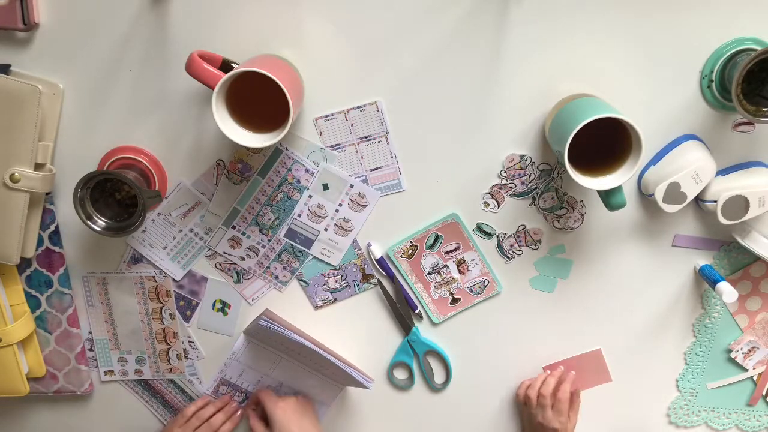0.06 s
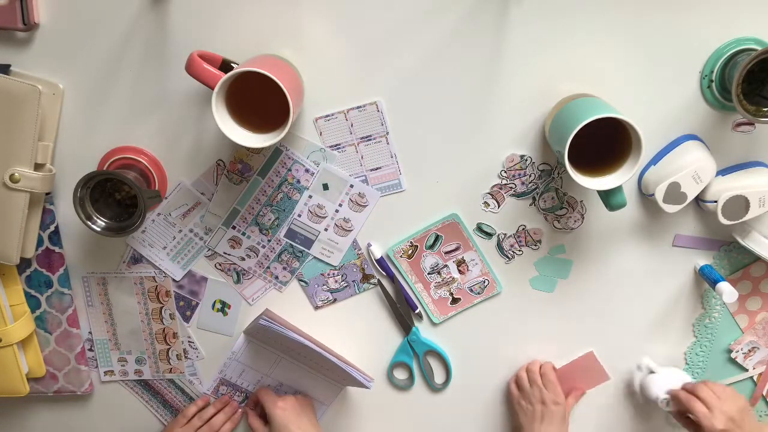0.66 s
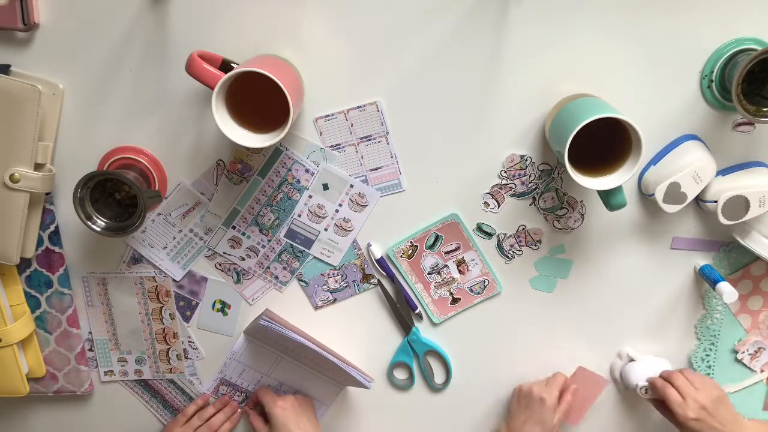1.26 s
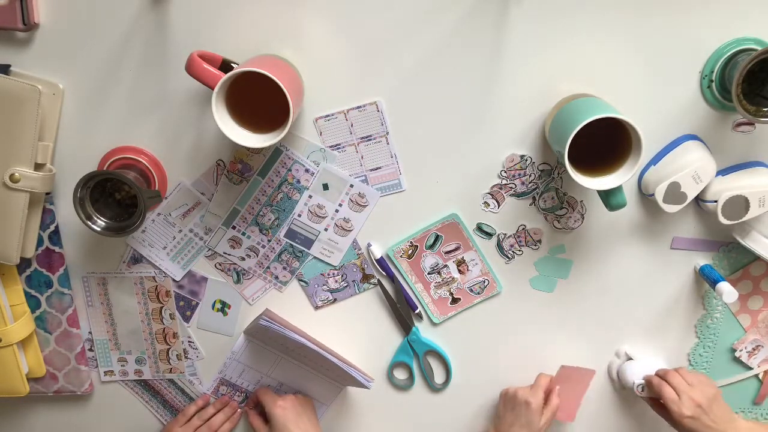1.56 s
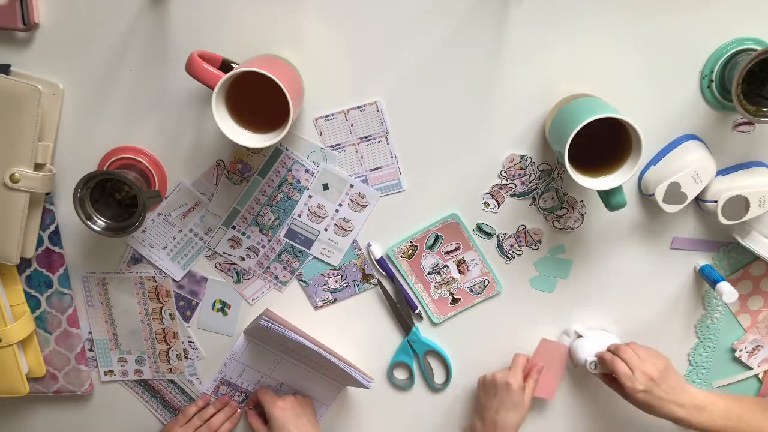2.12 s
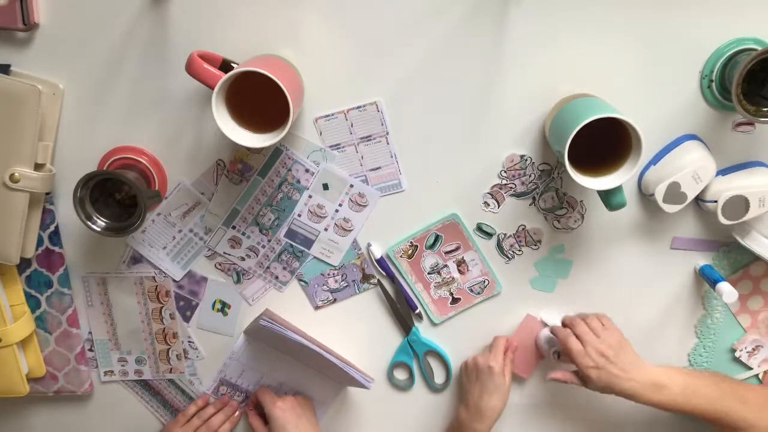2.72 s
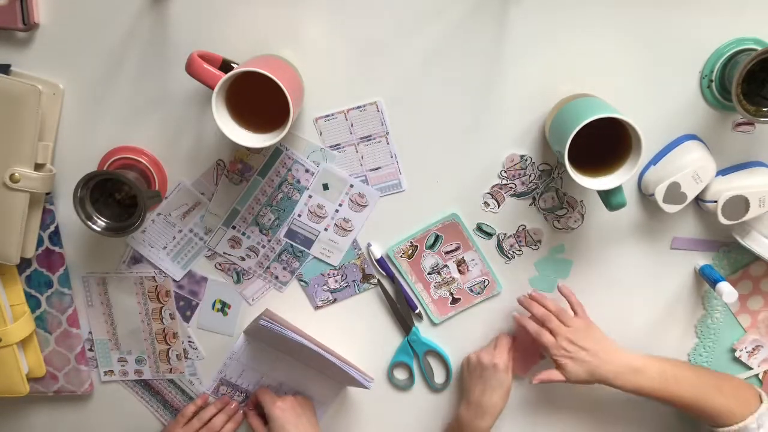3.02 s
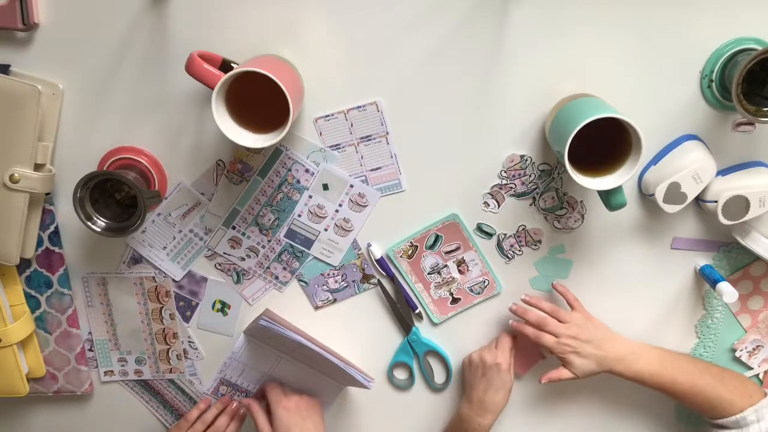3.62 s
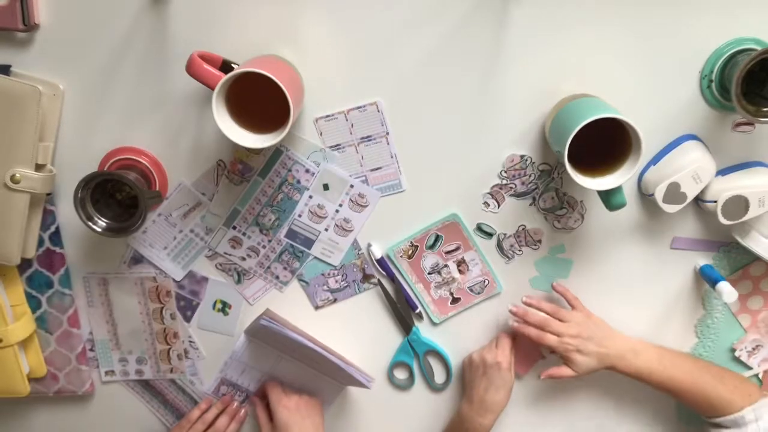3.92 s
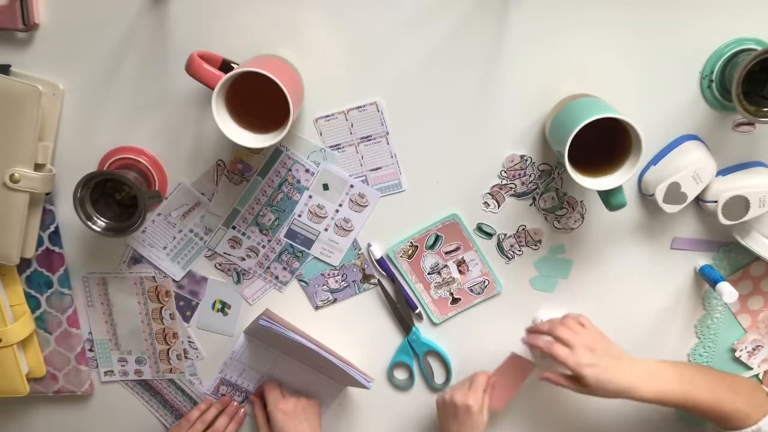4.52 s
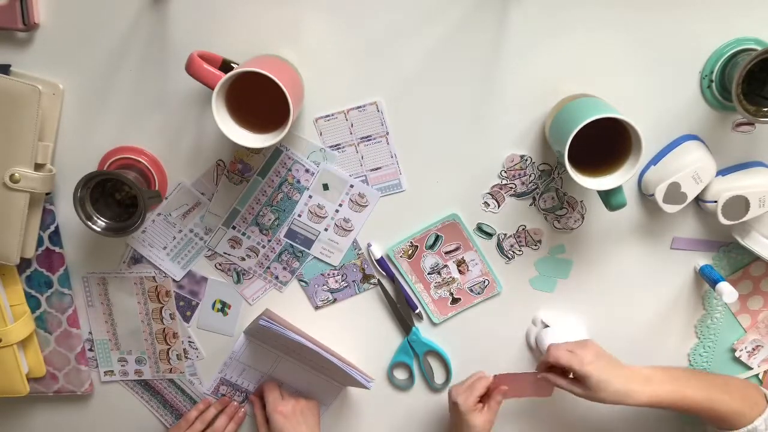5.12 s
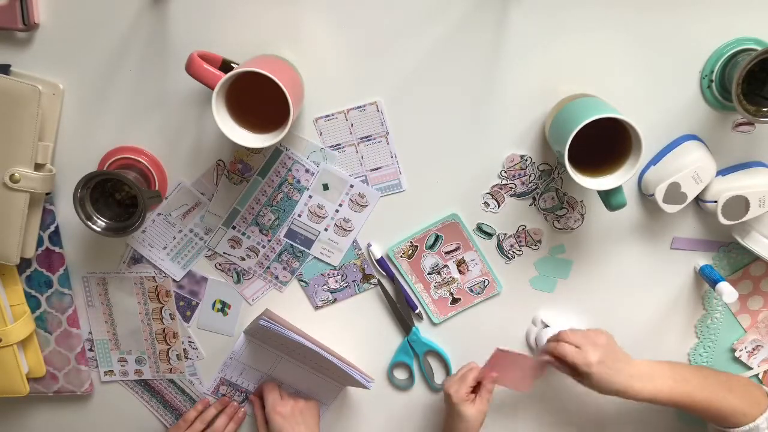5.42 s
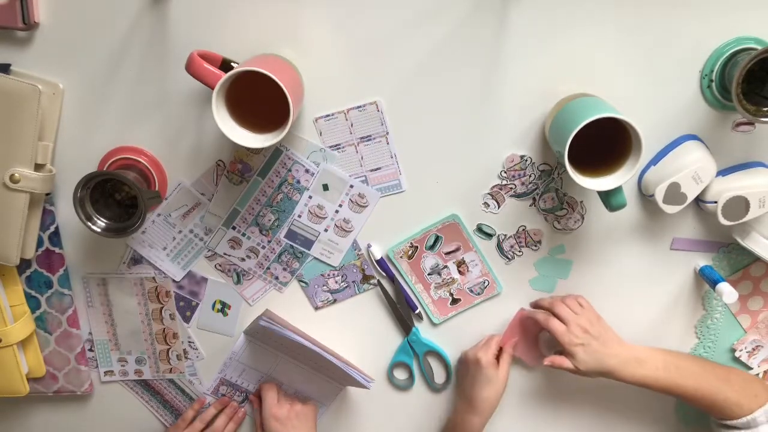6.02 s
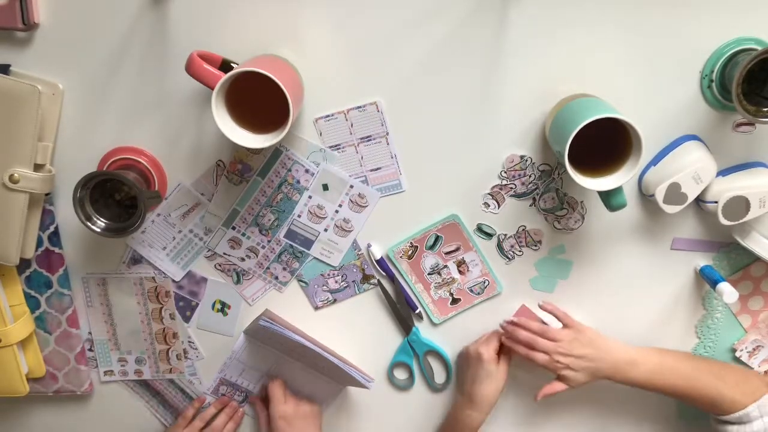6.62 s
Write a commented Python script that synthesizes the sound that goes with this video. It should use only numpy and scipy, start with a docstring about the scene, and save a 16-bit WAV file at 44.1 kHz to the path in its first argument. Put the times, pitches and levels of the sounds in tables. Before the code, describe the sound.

Light card scrapes and table thumps as a plastic paper punch is lined up, pressed with a snap, released and repositioned.

```python
"""Cardstock scrapes softly on a table, then a plastic craft punch knocks, clacks and snaps through it.
The punch is pulled over, set down, pressed, let go and lined up again; its lever rubs as it lifts.
Card fibres catch and slip, the card ticks, hands drag, and each knock rings the table top.
A small bare room answers, heard from an overhead microphone."""
import sys
import numpy as np
from scipy import signal
from scipy.fft import rfft, irfft
from scipy.io import wavfile
from scipy.ndimage import uniform_filter1d

SR = 44100
rng = np.random.default_rng(int(sys.argv[2]) if len(sys.argv) > 2 else 0)


def unload_audio(sound):
    """Save the sound as a 16-bit wav file, at the path given as the first command line argument."""
    columns = np.transpose(np.atleast_2d(sound))
    # keep every value between -1 and 1, then stretch to whole-number steps
    steps = np.round(np.clip(columns, -1, 1) * 32767)
    wavfile.write(sys.argv[1], SR, steps.astype(np.int16))


N = 298116
TIME_S = np.arange(N) / SR
RING_S = TIME_S[:SR // 2]
TOP_HZ = 16100


def undb(db):
    """Decibels to gain."""
    return 10 ** (np.asarray(db) / 20)


def unit(x):
    """Scale to rms 1."""
    return x / np.sqrt(np.mean(x ** 2))


def unit_hit(x):
    """Scale to the energy of 10 ms at rms 1."""
    return x * np.sqrt(SR / 100 / np.sum(x ** 2))


def add(track, start_s, sound):
    """Mix a sound into the track."""
    start = int(start_s * SR)
    track[start:start + len(sound)] += sound[:N - start]


def cut(x, hz, kind, order=2):
    """Causal low-pass or high-pass."""
    return signal.sosfilt(signal.butter(order, hz, kind, fs=SR, output="sos"), x)


def resonate(x, hz, q):
    """One resonance, Q at least 1."""
    return signal.lfilter(*signal.iirpeak(hz, max(q, 1), fs=SR), x)


def colour(x, spectrum):
    """Filter by a (Hz, dB) curve, to rms 1."""
    hz, db = np.transpose(spectrum)
    bins_hz = np.maximum(np.arange(N // 2 + 1) * SR / N, 1)
    gain = undb(np.interp(np.log(bins_hz), np.log(hz), db))
    return unit(irfft(rfft(x) * gain, N))


def flatten(x, bins):
    """Level a burst's broad spectral humps, keeping its fine grain."""
    spectrum = rfft(x)
    return irfft(spectrum / np.sqrt(uniform_filter1d(np.abs(spectrum) ** 2, size=bins)), len(x))


def fade(t60_s):
    """Exponential decay."""
    return np.exp(-np.log(1000) * RING_S / t60_s)


def swell(rise_s):
    """Contact builds up over a moment."""
    return 1 - np.exp(-RING_S / rise_s)


def wander(rate_hz):
    """Smooth random drift, rms 1."""
    hold = int(SR / rate_hz)
    steps = np.repeat(rng.standard_normal(N // hold + 1), hold)
    return unit(uniform_filter1d(steps, hold)[:N])


def friction(slips_per_s, spread_db, flutter_db):
    """Surfaces catch and let go: dense slips of uneven size, in uneven runs."""
    slips = (rng.random(N) < slips_per_s / SR) * rng.standard_normal(N)
    sizes = undb(spread_db * np.minimum(rng.exponential(size=N), 5))
    return slips * sizes * undb(flutter_db * wander(45))


def flex(x, depth_db, rate_hz):
    """The sliding card bends, so its resonant zones swell and fade separately."""
    zones = [resonate(x, hz, q=3) for hz in np.geomspace(700, 14000, 9)]
    return unit(x + sum(zone * (undb(depth_db * wander(rate_hz)) - 1) for zone in zones))


# Spectra of card scrape and card hiss. Each row: frequency in Hz, relative density in dB.
SCRAPE_SPECTRUM = [(250, -11), (600, 8), (1000, 7.5), (1600, 10.5), (2700, 4), (4200, -8), (7000, -8),
                   (16000, -34)]
HISS_SPECTRUM = [(1500, -11.5), (3500, -1.5), (5000, -3), (7000, -6), (9000, -6.5), (11000, -9.5),
                 (16000, -8)]
# Card edge under pressure. Each row: start in seconds, length in seconds, level in dB.
FIRM_STROKES = [(0, 0.028, -66), (.47, 0.18, -73.5), (.78, 0.13, -72.5), (1.02, 0.061, -75),
                (1.69, 0.082, -59.5), (2.28, 0.27, -71), (3.01, 0.16, -69), (3.29, 0.13, -63.5),
                (3.56, 0.16, -63), (3.79, 0.045, -58.5), (4.12, 0.085, -58.5), (4.92, 0.087, -62),
                (5.1, 0.054, -72), (5.81, 0.077, -57.5), (6.5, 0.076, -66), (6.62, .17, -64.5)]
# Light, quick slides of card and punch. Each row: start in seconds, length in seconds, level in dB.
LIGHT_STROKES = [(.77, 0.36, -72), (.955, 0.29, -59), (1.345, 0.1, -65.5), (1.55, 0.28, -71.5),
                 (2.24, 0.35, -68), (3.32, 0.11, -71.5), (4.28, 0.22, -61), (4.78, 0.33, -62.5),
                 (5.195, 0.18, -62), (5.41, 0.078, -66), (5.815, 0.16, -57), (6.19, 0.1, -68.5),
                 (6.47, 0.089, -73.5)]


def card_slides(fingers_db=-85):
    """Paper fibres slip: firm strokes mostly scrape, light ones mostly hiss."""
    scrape = colour(friction(11000, spread_db=1.3, flutter_db=2.6), SCRAPE_SPECTRUM)
    scrape = flex(scrape, depth_db=2.2, rate_hz=22)
    hiss = colour(friction(18000, spread_db=1, flutter_db=1), HISS_SPECTRUM)
    hiss = flex(hiss, depth_db=2.9, rate_hz=16)
    fingers = undb(fingers_db + 3 * wander(4.4))  # never quite still on the card
    firm = strokes(FIRM_STROKES) + fingers
    light = strokes(LIGHT_STROKES)
    return scrape * np.hypot(firm, undb(-10.5) * light) + hiss * np.hypot(light, undb(-10) * firm)


def strokes(rows, fastest_share=0.34, speed_power=0.7):
    """Envelope of hand movements: each speeds up smoothly and slows to a stop."""
    envelope = np.zeros(N)
    for start_s, length_s, db in rows:
        along = np.linspace(0, 1, int(length_s * SR))
        speed = np.sin(np.pi / 2 * np.interp(along, [0, fastest_share, 1], [0, 1, 0]))
        add(envelope, start_s, undb(db) * speed ** speed_power)
    return envelope


# Lasting modes of the table top. Each row: frequency in Hz, relative level in dB, t60 in seconds.
TABLE_MODES = [(65, -16.5, 0.2), (87.2, -15.5, 0.42), (115, -6, 0.2), (156, -19.5, 0.71), (202.1, -9, 0.24),
               (276.7, 1, 0.14), (296.5, 0.5, 0.12), (347.4, -12, 0.32), (427.3, -1, 0.078),
               (575.4, -14, 0.29), (598, -13.5, 0.2), (675, -3, 0.074), (755, -17, 0.099), (935, -4, 0.042),
               (1158, -3.5, 0.084)]
# Hands leaning on the table. Each row: start in seconds, length in seconds, level in dB.
HAND_DRAGS = [(.11, 0.095, -73), (.47, 0.2, -60.5), (.8, 0.22, -63), (1.26, 0.067, -56), (3.33, 0.14, -59),
              (3.57, .22, -54), (4.03, 0.33, -54), (5.83, 0.078, -62), (6.13, 0.088, -49.5),
              (6.69, 0.2, -50)]


def hand_drags():
    """Friction under the hands drives the table's modes into a low rumble."""
    slips = friction(1500, spread_db=2.2, flutter_db=0.81)
    damped_top = ring(TABLE_MODES, detune=0.0047) * fade(0.1)
    rumble = signal.fftconvolve(slips, damped_top)[:N]
    return unit(cut(rumble, 64, "low", order=1)) * strokes(HAND_DRAGS)


def ring(modes, detune):
    """Damped modes; each contact lands elsewhere and shifts them a little."""
    shifts = 1 + detune * rng.standard_normal(len(modes))
    return sum((-1) ** k * undb(db) * fade(t60_s) * np.sin(2 * np.pi * hz * shifts[k] * RING_S)
               for k, (hz, db, t60_s) in enumerate(modes))


# Brief slap of punch on table. Each row: frequency in Hz, relative level in dB, t60 in seconds.
SLAP_MODES = [(417, 22, 0.015), (639, 16.5, 0.041), (805, 15.5, 0.047), (1050, 16.5, 0.025),
              (1440, 15, 0.013)]
# Blows on the table. Each row: start in seconds, level in dB over 10 ms, contact hardness in Hz.
TABLE_KNOCKS = [(.38, -48, 403), (.403, -48, 312), (1.208, -44, 260), (1.396, -43.5, 194),
                (1.435, -42, 148), (1.649, -49.5, 188), (1.734, -48, 197), (1.89, -48, 216),
                (2.507, -54, 131), (2.582, -35, 318), (2.6738, -25.5, 510), (3.108, -60, 480),
                (3.289, -56.5, 570), (3.543, -44, 504), (3.799, -38, 127), (3.8467, -25, 756),
                (4.134, -50.5, 455), (4.294, -37.5, 387), (4.795, -58, 654), (5.903, -46, 173),
                (6.107, -42, 337), (6.125, -38.5, 354), (6.629, -49.5, 724), (6.709, -48.5, 520)]


def table_knocks(push_cycles=0.25):
    """A soft contact lasts longer and reaches only the low modes; a hard one slaps."""
    track = np.zeros(N)
    for start_s, db, hardness_hz in TABLE_KNOCKS:
        slap_share = 0.51 * (hardness_hz / 494) ** 1.3
        top = ring(TABLE_MODES, detune=0.012) + slap_share * ring(SLAP_MODES, detune=0.02)
        knock = cut(top * swell(push_cycles / hardness_hz), hardness_hz, "low", order=3)
        add(track, start_s, undb(db) * unit_hit(knock))
    return track


# Card against table and punch. Each row: start in seconds, level in dB over 10 ms, resonance in Hz,
# rattle t60 in seconds.
CARD_TICKS = [(0.3835, -54, 1120, 0.033), (0.881, -59.5, 1490, 0.014), (1.045, -61, 750, 0.025),
              (1.552, -62, 1740, 0.062), (1.661, -59.5, 980, 0.065), (1.6915, -53, 2040, .026),
              (1.9342, -55.5, 1580, 0.019), (2.3311, -59, 1540, 0.045), (2.747, -61, 2450, 0.088),
              (3.291, -55.5, 1610, 0.018), (3.358, -69, 13000, 0.017), (3.414, -70.5, 11100, 0.0049),
              (3.515, -69, 9200, .012), (3.7952, -62.5, 1310, 0.0088), (4.131, -57, 1820, 0.032),
              (4.171, -57, 2640, 0.013), (4.2012, -56.5, 2500, 0.0033), (4.2692, -54.5, 2600, .012),
              (4.7929, -58, 1140, 0.0037), (5.435, -78, 5000, .06), (5.676, -58.5, 1210, 0.056),
              (6.4052, -62.5, 2150, 0.018)]


def card_ticks():
    """The card ticks and crackles; the same card rings each time, so Q is shared."""
    track = np.zeros(N)
    for start_s, db, hz, t60_s in CARD_TICKS:
        add(track, start_s, undb(db) * tap(hz, t60_s, q=1.4, edge_db=-12))
    return track


def tap(hz, t60_s, q, edge_db, overtone_ratio=1.24, overtone_db=-5):
    """A snap and a short rattle of edges excite the card or the punch's shell."""
    scuff = unit_hit(rattle(t60_s) * swell(0.54 * t60_s))  # glancing contacts: longer, softer onset
    snap = 0.18 * rattle(t60_s=0.0023)
    contact = scuff + snap
    body = resonate(contact, hz, q) + undb(overtone_db) * resonate(contact, hz * overtone_ratio, q)
    body = cut(body, 0.55 * hz, "high", order=4)  # small parts radiate little below resonance
    body = cut(body, max(5500, hz), "low")
    edge = cut(contact, 6300, "high")
    return unit_hit(unit_hit(body) + undb(edge_db) * unit_hit(edge))


def rattle(t60_s):
    """A dying burst of tiny collisions with a flat spectrum."""
    burst = rng.standard_normal(len(RING_S)) * fade(t60_s)
    return unit_hit(flatten(burst, bins=200) * fade(8 * t60_s))


# Impacts in the punch. Each row: start in seconds, level in dB over 10 ms, resonance in Hz, Q,
# rattle t60 in seconds, sharp edge in dB relative to the body.
PUNCH_CLACKS = [(1.2058, -48.5, 2660, 6.4, .03, -42), (1.350, -50, 850, .7, 0.061, -20),
                (1.9449, -43.5, 1700, 2, 0.034, -21), (1.949, -47.5, 1570, 4, 0.056, -13),
                (1.989, -46, 1190, 4.8, 0.034, -12.5), (2.5811, -46.5, 1135, 3.2, 0.023, -17),
                (2.674, -46, 970, 10, 0.03, -27), (2.741, -66.5, 9100, 16, 0.042, -20),
                (3.5405, -44.5, 1140, 1.7, 0.011, -7), (3.846, -40, 2640, .65, .01, -11),
                (3.846, -41, 7400, 1.9, 0.0063, -13), (3.856, -45, 1840, 2.6, 0.018, -20),
                (4.2907, -53.5, 1450, 3.3, 0.015, -27), (4.3864, -39, 1120, 2.1, 0.014, -9),
                (4.803, -51.5, 1080, .8, 0.046, -7), (5.8314, -49, 2080, .7, 0.0082, -28),
                (5.9, -42.5, 2670, 1.1, 0.0032, -2.5), (5.903, -33.5, 2160, .8, 0.0076, -10),
                (5.905, -42, 1100, .75, 0.037, -30), (6.106, -49.5, 1280, 3.3, 0.029, -25),
                (6.1245, -39.5, 1190, 2.2, 0.0065, -18), (6.5883, -55, 1210, 9.6, 0.01, -27),
                (6.6268, -54, 1430, 1.5, .022, -18), (6.710, -54, 1020, 2.4, 0.017, -11.5)]


def punch_clacks():
    """The plastic shell rings as the punch clacks, snaps and springs back."""
    track = np.zeros(N)
    for start_s, db, hz, q, t60_s, edge_db in PUNCH_CLACKS:
        add(track, start_s, undb(db) * tap(hz, t60_s, q, edge_db))
    return track


# The spring lifts the lever. Each row: time in seconds, resonance in Hz, level in dB.
LEVER_PATH = [(4.294, 1416, -65), (4.325, 1800, -57), (4.349, 2600, -53), (4.372, 2077, -47.5),
              (4.39, 1720, -72), (4.429, 1517, -51.5), (4.47, 1297, -70)]


def lever_rub(half_width_hz=550):
    """Plastic sticks and slips in the housing, in a resonance that moves with the lever."""
    times_s, hz, db = np.transpose(LEVER_PATH)
    slips = cut(friction(2500, spread_db=1.5, flutter_db=1.6), half_width_hz, "low")
    phase = 2 * np.pi * np.cumsum(np.interp(TIME_S, times_s, hz)) / SR
    moving = (TIME_S > times_s[0]) & (TIME_S < times_s[-1])
    return unit(slips * np.sin(phase)) * undb(np.interp(TIME_S, times_s, db)) * moving


# Room response. Each row: frequency in Hz, reverberant over direct level in dB, t60 in seconds.
ROOM_BANDS = [(101, -7.5, 0.72), (316, -7.5, 0.45), (774, -0.5, 0.39), (1400, 0, 0.4), (3930, -3, 0.36),
              (7200, -2.5, 0.22), (14000, -7.5, 0.18)]


def room(x, first_s=0.002, build_s=0.0064, end_s=0.4, lumpy_db=4):
    """Single early reflections thicken into a diffuse tail whose treble dies first."""
    hz, wet_db, t60_s = np.transpose(ROOM_BANDS)
    size = len(RING_S)
    echoes = rng.standard_normal(size) * undb(lumpy_db * rng.standard_normal(size) * fade(0.32))
    echoes *= np.clip((RING_S - first_s) / build_s, 0, 1)
    gate = (RING_S > first_s) & (RING_S < end_s)
    bins_hz = np.arange(size // 2 + 1) * SR / size
    edges_hz = np.geomspace(45, 18000, 15)
    tail = np.zeros(size)
    for low, high in zip(edges_hz, edges_hz[1:]):
        log_centre = np.log(low * high) / 2
        band_db = np.interp(log_centre, np.log(hz), wet_db)
        band_t60_s = np.interp(log_centre, np.log(hz), t60_s)
        spectrum = rfft(flatten(echoes * fade(band_t60_s), bins=80))
        band = irfft(spectrum * ((bins_hz >= low) & (bins_hz < high)), size) * gate
        tail += undb(band_db) * band * np.sqrt(2 * (high - low) / SR / np.sum(band ** 2))
    return x + signal.fftconvolve(x, tail)[:N]


# Background of the quiet room. Each row: frequency in Hz, relative density in dB.
ROOM_TONE_SPECTRUM = [(25, -19), (55, -1.5), (115, -5), (300, -6), (750, -16), (1400, -19.5), (2200, -23.5),
                      (5000, -24.5), (10000, -29.5), (16000, -32)]


def scene(room_tone_db=-69):
    """Taps, knocks and rubbing each cross the room by their own paths, over steady room tone."""
    room_tone = undb(room_tone_db) * colour(rng.standard_normal(N), ROOM_TONE_SPECTRUM)
    taps = room(punch_clacks() + card_ticks())
    knocks = room(table_knocks())
    rubbing = room(card_slides() + hand_drags() + lever_rub())
    return (taps + knocks + rubbing + room_tone)[None]


def record(dry):
    """The microphone thins the deepest bass and cuts the top."""
    thinned = cut(dry, 48, "high", order=4)
    return signal.sosfilt(signal.ellip(10, 0.2, 70, TOP_HZ, fs=SR, output="sos"), thinned)


dry = scene()
out = record(dry)
unload_audio(out)
```